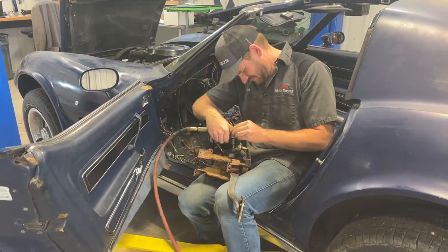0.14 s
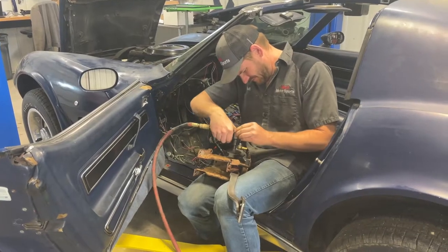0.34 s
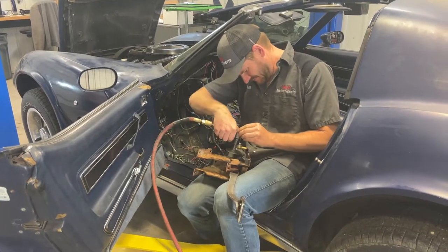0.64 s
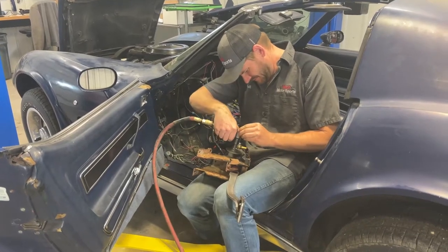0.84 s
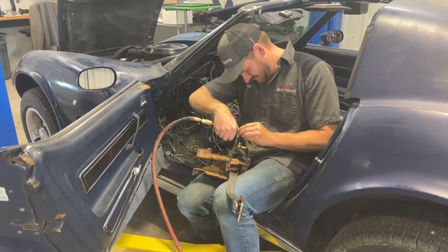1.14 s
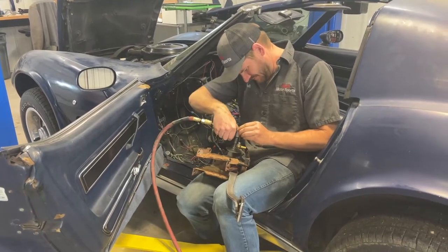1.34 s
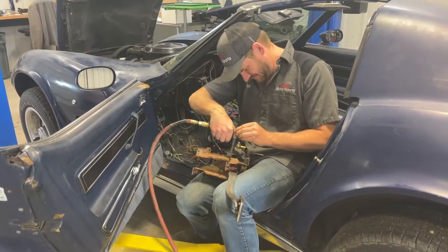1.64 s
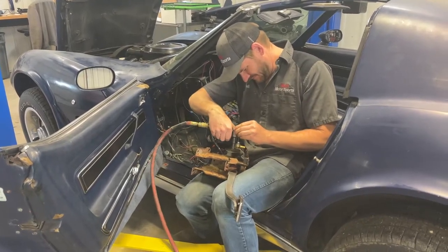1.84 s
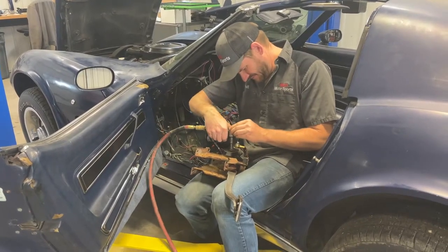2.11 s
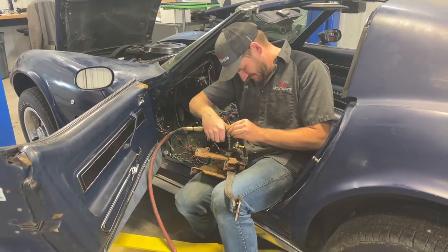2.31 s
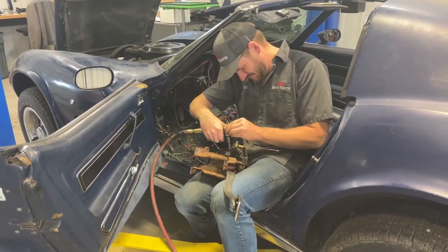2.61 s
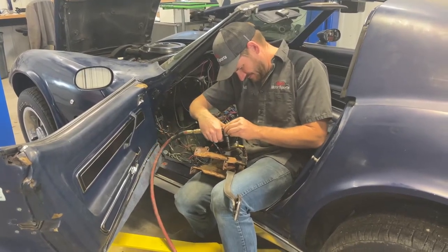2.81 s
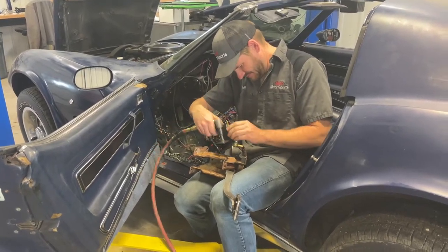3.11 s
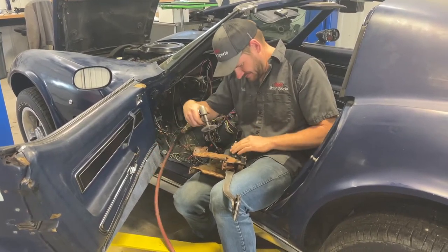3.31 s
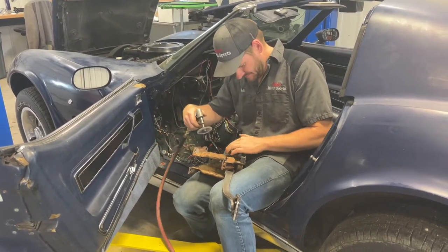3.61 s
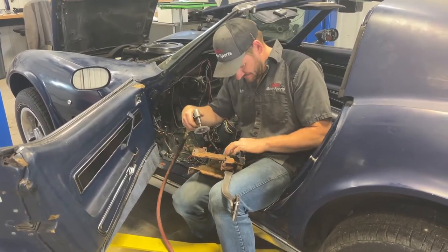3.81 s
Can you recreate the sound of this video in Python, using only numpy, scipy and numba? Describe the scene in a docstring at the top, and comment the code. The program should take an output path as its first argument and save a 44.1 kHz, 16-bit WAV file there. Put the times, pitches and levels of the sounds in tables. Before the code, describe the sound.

An air cut-off tool grinds steel close by in a large garage, its wavering whine mixed with harsh hiss and ringing metal. It is then released and spins down with a quickly falling pitch, leaving a faint electrical hum.

```python
"""An air cut-off tool is already grinding a steel part inside a car, in a large garage. The wheel's grit
rings the steel, the vane motor whines and sags under load, and air hisses from the exhaust.
At three seconds the trigger is let go: the wheel lifts, and the motor blats and spins down at once.
The hall rings out, and the gain control recovers and lets a mains hum come up."""
import sys
import numpy as np
from scipy import signal
from scipy.fft import rfft, irfft, next_fast_len
from scipy.io import wavfile
from numba import njit

SR = 44100
rng = np.random.default_rng(int(sys.argv[2]) if len(sys.argv) > 2 else 0)


def waveform_to_disk(signal):
    """Save audio, clipped to [-1, 1], as 16-bit WAV at the path in sys.argv[1]."""
    frames = np.transpose(np.atleast_2d(signal))
    scaled = np.clip(frames, -1, 1) * 32767
    samples = np.round(scaled).astype(np.int16)
    wavfile.write(sys.argv[1], SR, samples)


N = 174195
T = np.arange(-int(0.6 * SR), N) / SR  # pre-roll: the tool is already running

# Resonances of the steel and wheel (f/Hz, width/Hz, level/dB); levels in all tables are relative
STEEL_MODES = [(2526, 134, -7), (2748, 123, -5.5), (2840, 104, -5.5), (3332, 345, -10), (4230, 230, -10),
               (5084, 129, 1.5), (5244, 136, 0.5), (5417, 215, 0.5), (5707, 285, -5.5)]
# The wheel's own high notes (f/Hz, width/Hz, level/dB)
WHEEL_MODES = [(6530, 370, -7.5), (7040, 112, 0)]
# Envelope of the steel's lower ring (t/s, level/dB)
LOW_RING_ENVELOPE = [(0.0, -33.0), (0.1, -30.5), (0.52, -29.0), (0.68, -29.0), (0.74, -26.0), (0.96, -31.0),
                     (1.2, -28.0), (1.38, -31.5), (1.6, -28.5), (1.72, -32.0), (1.84, -29.5), (2.12, -31.0),
                     (2.34, -30.0), (2.74, -31.0), (2.8, -34.0), (2.94, -32.0)]
# How hard the wheel bites: envelope of the steel's upper ring (t/s, level/dB)
BITE_ENVELOPE = [(0.0, -28), (0.24, -19.5), (0.58, -23.5), (0.72, -19), (0.8, -28), (1.04, -23.5),
                 (1.26, -24), (1.42, -29.5), (1.64, -21.5), (1.72, -33), (1.8, -22.0), (1.92, -22.5),
                 (2.0, -18), (2.24, -23.5), (2.34, -21.5), (2.54, -27.5), (2.68, -21), (2.94, -25)]
# Envelope of the wheel's notes (t/s, level/dB)
WHEEL_ENVELOPE = [(0.0, -36), (0.12, -25), (0.28, -31.5), (0.78, -26.5), (0.92, -30.5), (1.06, -27),
                  (1.34, -33), (1.44, -23.5), (1.74, -38), (1.78, -20.5), (2.08, -32), (2.22, -24),
                  (2.32, -29), (2.42, -29), (2.64, -24.0), (2.88, -35), (2.92, -21.5), (2.94, -42)]
# Colour of the cut's treble hiss (f/Hz, level/dB)
HISS_COLOUR = [(4500, -49), (6000, -2), (6800, -9.5), (7300, -3.5), (7650, -8.5), (8080, -22), (8550, -2),
               (9300, -6), (10100, -10.5), (11000, -9.5), (11400, -2.5), (11900, -11.5), (12350, -5),
               (12900, -6.5), (14100, -6), (15700, -6.5)]
# Envelope of that hiss (t/s, level/dB)
HISS_ENVELOPE = [(0.0, -27.5), (0.18, -23.5), (0.26, -25), (0.44, -25.0), (0.92, -27.5), (1.06, -25),
                 (1.14, -28.5), (1.18, -25), (1.34, -30.0), (1.4, -24.5), (1.58, -26.5), (1.74, -29.5),
                 (1.84, -24), (2.1, -26.5), (2.2, -24.5), (2.48, -26.5), (2.72, -24.5), (2.8, -29),
                 (2.9, -23.5), (2.94, -31)]
# Pitch of the motor as the wheel is pressed and eased (t/s, f/Hz)
MOTOR_PITCH = [(0.0, 585), (0.05, 610), (0.13, 604), (0.22, 573), (0.27, 538), (0.31, 535), (0.36, 563),
               (0.49, 581), (0.65, 506), (0.73, 525), (0.92, 500), (1.02, 579), (1.2, 552), (1.3, 548),
               (1.37, 612), (1.41, 609), (1.5, 542), (1.66, 517), (1.69, 528), (1.76, 605), (1.8, 610),
               (1.9, 545), (1.96, 579), (2.09, 556), (2.13, 591), (2.27, 548), (2.32, 558), (2.4, 524),
               (2.51, 565), (2.6, 540), (2.66, 548), (2.74, 516), (2.77, 522), (2.81, 564), (2.86, 566),
               (2.92, 542), (2.97, 584), (2.99, 558)]
# Motor harmonics, lowest first (powered level/dB, gain per 100 Hz of pitch/dB, coasting level/dB)
MOTOR_HARMONICS = [(2, -4.5, 0), (-6, -1.5, 1), (-8, 1, -1.5), (-6, 2, -11), (-18, -4, -8), (-14, 10, -33)]
# Faint lines between the harmonics, from unequal vanes (cycles per shaft turn, level/dB)
SHAFT_LINES = [(2, -34), (3, -29), (6, -22.5), (7, -19)]
# Brief dips in the whine's fundamental; a negative depth is a swell (t/s, half length/s, depth/dB)
WHINE_DIPS = [(0.23, 0.019, 19), (0.396, 0.028, 22), (.45, 0.028, 43), (0.54, 0.017, 25),
              (0.786, 0.023, 30), (1.13, 0.051, 12), (1.409, 0.014, 32), (1.466, 0.0065, 12),
              (1.85, 0.04, 11.5), (2.035, 0.033, 34), (2.147, 0.0096, -6), (2.193, 0.03, 16),
              (2.5, 0.021, 15), (2.823, 0.01, 21)]
# Colour of the rushing exhaust air (f/Hz, level/dB)
AIR_COLOUR = [(25, -54), (60, -37), (150, -16), (330, -18.5), (480, -11), (720, -11.5), (1000, -3.5),
              (1300, -5.5), (1600, 1), (2000, 0), (2600, -3), (3300, -1.5), (3900, -0.5), (5000, 9.5),
              (8000, -3), (15000, -28)]
# Colour of the exhaust port while the motor coasts (f/Hz, level/dB)
PORT_COLOUR = [(100, 0), (200, 1), (330, 2), (430, -7.5), (550, 2), (740, 7.5), (880, -2.5), (1050, 0.5),
               (1400, -9.5), (2500, -2)]
# Reverb time of the hall (f/Hz, t60/s)
HALL_DECAY = [(150, 0.4), (500, 0.88), (1400, 0.88), (3500, 0.97), (5500, 0.93), (8500, 0.74),
              (11000, 0.49), (15000, 0.31)]
# Partials of the mains hum (f/Hz, level/dB)
MAINS_HUM = [(60, -79), (120, -55), (180, -80.5), (241, -58), (289, -71), (333, -68.5)]
# Colour of the workshop's room tone (f/Hz, level/dB)
ROOM_TONE = [(25, -38), (50, -3), (70, -3), (120, 6), (200, -2.5), (330, -5), (600, -8), (1200, -13),
             (3000, -16), (6000, -21.5), (15000, -36)]

RELEASE_S, AIR_OFF_S, SPIN_DOWN_S = 2.994, 0.031, 0.108  # trigger let go: air and pitch die away
LIFT_S, LIFT_FADE_S = 3.002, 0.058  # the wheel leaves the steel
GRIT_PER_S, GRIT_SPREAD_DB, WOBBLE = 12000, 2, 0.46
LOW_RING_DB, BITE_DB, WHEEL_DB, HISS_DB, RING_SPLIT_HZ = 5, 4.5, 6, 9, 3800
VANES, WORKING_HZ, STALL_HZ, PITCH_JITTER = 4, 550, 170, 0.005
WHINE_DB, AIR_DB, ROOM_TONE_DB = -24, -22, -51.5
BLAT_DB, BLAT_ATTACK_S, BLAT_FADE_S = -14, 0.0036, 0.035
CABIN_DB, CABIN_FADE_S, HALL_DB, HALL_BLOOM_S = -2.5, 0.0082, -3, 0.023
ECHO_DB, ECHO_DELAY_S, ECHO_SMEAR_S, ECHO_TOP_HZ = -27, 0.56, 0.12, 6730
THRESHOLD_DB, RATIO, GAIN_ATTACK_S, GAIN_RELEASE_S, TOP_HZ = -22.5, 2.21, 0.034, 0.1, 15650


def grind(phase):
    """Grit strikes the steel, hardest once a shaft turn: part and wheel ring, and the cut hisses."""
    contact = (1 + WOBBLE * np.cos(phase / VANES + 2 * drift(30))) * fade(LIFT_S, LIFT_FADE_S)
    hits = rng.random(len(T)) < GRIT_PER_S / SR
    force = rng.standard_normal(len(T)) * undb(GRIT_SPREAD_DB * rng.standard_normal(len(T)))
    grit = hits * force * contact
    low_modes = [mode for mode in STEEL_MODES if mode[0] < RING_SPLIT_HZ]
    high_modes = [mode for mode in STEEL_MODES if mode[0] >= RING_SPLIT_HZ]
    low = ring(grit, low_modes) * undb(curve(LOW_RING_ENVELOPE) + LOW_RING_DB)
    high = ring(grit, high_modes) * undb(curve(BITE_ENVELOPE) + BITE_DB)
    hiss = noise(HISS_COLOUR) * contact * flutter(db=1.2, rate=87)
    wheel = ring(grit, WHEEL_MODES) * undb(curve(WHEEL_ENVELOPE) + WHEEL_DB)
    return low + high + wheel + hiss * undb(curve(HISS_ENVELOPE) + HISS_DB)


def ring(grit, modes):
    """Resonances struck by the grit, each flaring on its own as the contact point moves; rms near 1."""
    flaring, steady = 0, 0
    for k, (hz, width, db) in enumerate(modes):
        resonance = lambda f: 1j * f * width / (hz ** 2 - f ** 2 + 1j * f * width)
        note = (-1) ** k * undb(db) * shape(grit, resonance)
        flaring += unit(flutter(db=3, rate=14)) * note
        steady += note
    return flaring / np.std(steady[T < LIFT_S])


def whine(hz, phase):
    """The vanes chop the air into a whine, fuller under load and brighter at speed."""
    overspeed = (hz - WORKING_HZ) / 100
    dip_db = sum(db * np.exp(-((T - at) / half) ** 2) for at, half, db in WHINE_DIPS)
    tone = sum(undb(db) * flutter(db=2.5, rate=11) * np.sin(k * phase / VANES) for k, db in SHAFT_LINES)
    for k, (powered_db, speed_db, _) in enumerate(MOTOR_HARMONICS, 1):
        waver = flutter(db=2.5, rate=35) * undb(-dip_db) if k == 1 else flutter(db=3.5, rate=22)
        tone += undb(powered_db + speed_db * overspeed) * waver * np.sin(k * phase)
    return tone * undb(WHINE_DB) * fade(RELEASE_S, AIR_OFF_S)


def exhaust():
    """Air rushes out as long as the trigger is held."""
    return noise(AIR_COLOUR) * undb(AIR_DB) * fade(RELEASE_S, AIR_OFF_S)


def blat(hz, phase):
    """Air shut off, the coasting vanes pump a louder, falling note through the port until they stall."""
    envelope = (1 - fade(RELEASE_S - BLAT_ATTACK_S, BLAT_ATTACK_S)) * fade(RELEASE_S, BLAT_FADE_S)
    turning = hz ** 6 / (hz ** 6 + STALL_HZ ** 6)
    tone = sum(undb(coasting_db + over_hz(PORT_COLOUR, k * hz)) * np.sin(k * phase)
               for k, (_, _, coasting_db) in enumerate(MOTOR_HARMONICS, 1))
    return tone * undb(BLAT_DB) * envelope * turning


def garage(x):
    """Early reflections in the cabin, the tail of the hall and a dull echo from its far wall."""
    t = np.arange(2 * SR) / SR
    impulse = lambda tail: unit(tail) / np.sqrt(len(t))  # energy 1
    burst = lambda seconds: impulse(rng.standard_normal(len(t)) * np.exp(-t / seconds) * (t > 0.002))
    diffuse, hall = rng.standard_normal(len(t)), 0
    for k, (_, t60) in enumerate(HALL_DECAY):
        band = [(hz, float(j == k)) for j, (hz, _) in enumerate(HALL_DECAY)]
        hall += shape(diffuse, lambda f: over_hz(band, f)) * undb(-60 * t / t60)
    hall = impulse(hall * (1 - np.exp(-t / HALL_BLOOM_S)))
    far_wall = lambda f: np.exp(-2j * np.pi * f * ECHO_DELAY_S) / (1 + (f / ECHO_TOP_HZ) ** 10)
    echo = shape(burst(ECHO_SMEAR_S), far_wall)
    room = undb(CABIN_DB) * burst(CABIN_FADE_S) + undb(HALL_DB) * hall + undb(ECHO_DB) * echo
    wet = signal.fftconvolve(x, room)[:len(x)]
    return (x + wet) / np.sqrt(1 + undb(CABIN_DB) ** 2 + undb(HALL_DB) ** 2)


def workshop():
    """A slightly wavering mains hum over a bed of dull room tone."""
    hum = sum(undb(db) * np.sqrt(2) * np.sin(2 * np.pi * hz * T + 0.15 * drift(10))
              for hz, db in MAINS_HUM)
    return hum + undb(ROOM_TONE_DB) * noise(ROOM_TONE)


def undb(db):
    """Decibels to gain."""
    return 10 ** (np.asarray(db) / 20)


def unit(x):
    """Scale to rms 1."""
    return x / np.sqrt(np.mean(x ** 2))


def curve(rows):
    """Join (t/s, value) breakpoints by straight lines."""
    return np.interp(T, *np.array(rows).T)


def over_hz(rows, hz):
    """Read (f/Hz, value) breakpoints on a log-frequency axis."""
    f, values = np.array(rows).T
    return np.interp(np.log(np.maximum(hz, 1)), np.log(f), values)


def shape(x, response):
    """Filter by a response given as a function of frequency."""
    size = next_fast_len(len(x) + SR // 10)
    return irfft(rfft(x, size) * response(np.fft.rfftfreq(size, 1 / SR)), size)[:len(x)]


def noise(colour):
    """Noise of rms 1 with the given colour."""
    return unit(shape(rng.standard_normal(len(T)), lambda f: undb(over_hz(colour, f))))


def drift(rate):
    """Smooth random modulation of rms 1 that changes about rate times a second."""
    return unit(shape(rng.standard_normal(len(T)), lambda f: np.exp(-(f / rate) ** 2)))


def flutter(db, rate):
    """A gain that drifts up and down by about db decibels."""
    return undb(db * drift(rate))


def fade(start, seconds):
    """Hold until start, then die away."""
    return np.exp(-np.maximum(T - start, 0) / seconds)


@njit
def follow(level, attack, release):
    """Envelope follower: quickly up and slowly down."""
    out, held = np.empty(len(level)), level[:2000].mean()
    for i in range(len(level)):
        held += (level[i] - held) * (attack if level[i] > held else release)
        out[i] = held
    return out


def scene():
    """Tool and garage, the same in both channels; half the whine is beamed straight at the listener."""
    hz = curve(MOTOR_PITCH) * fade(RELEASE_S, SPIN_DOWN_S) * (1 + PITCH_JITTER * drift(61.4))
    phase = 2 * np.pi * np.cumsum(hz) / SR
    half_whine = 0.5 * whine(hz, phase)
    tool = half_whine + blat(hz, phase) + exhaust() + grind(phase)
    mix = half_whine + garage(tool) + workshop()
    return np.tile(mix[-N:], (2, 1))


def record(dry):
    """Gain control holds the loud tool down and recovers after it; a steep low-pass trims the top."""
    level = follow(np.abs(dry[0]), 1 / (GAIN_ATTACK_S * SR), 1 / (GAIN_RELEASE_S * SR))
    gain = np.maximum(level / undb(THRESHOLD_DB), 1) ** (1 / RATIO - 1)
    low_pass = signal.ellip(12, 0.1, 90, TOP_HZ, fs=SR, output="sos")
    return signal.sosfilt(low_pass, dry * gain)


dry = scene()
out = record(dry)
waveform_to_disk(out)
```